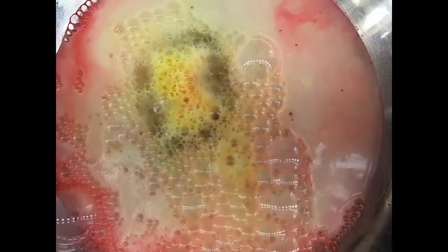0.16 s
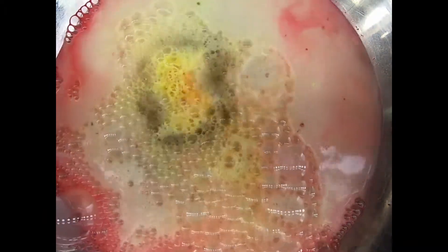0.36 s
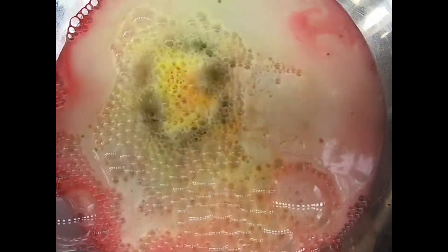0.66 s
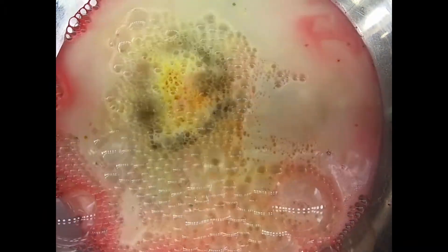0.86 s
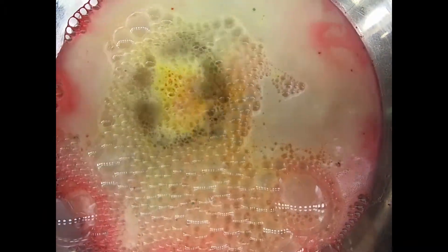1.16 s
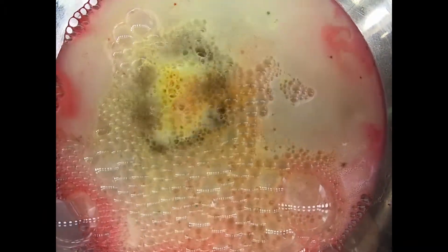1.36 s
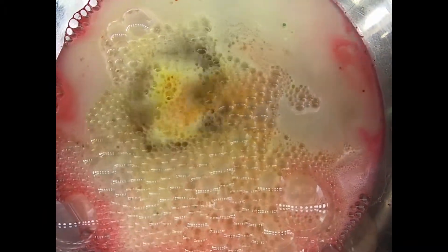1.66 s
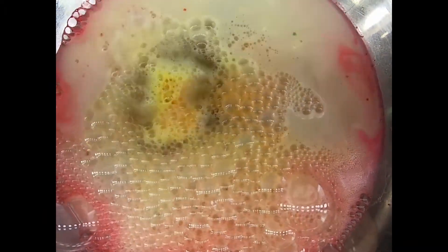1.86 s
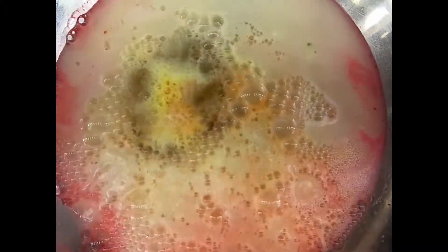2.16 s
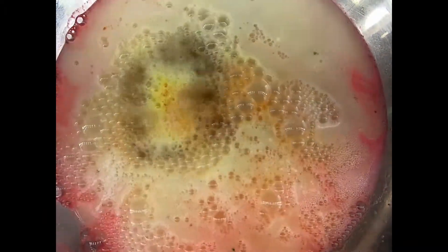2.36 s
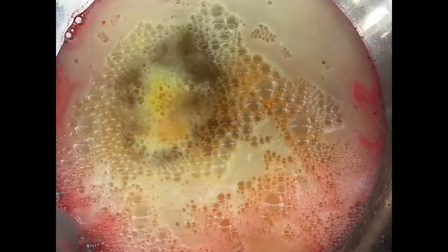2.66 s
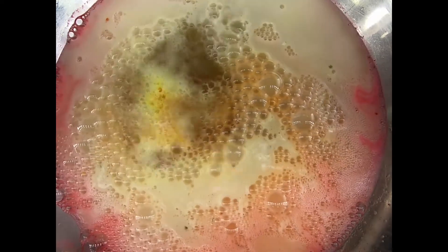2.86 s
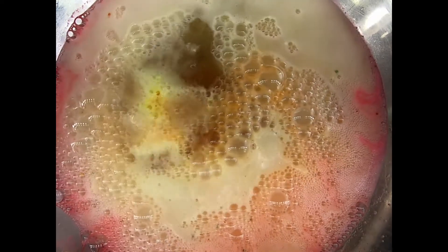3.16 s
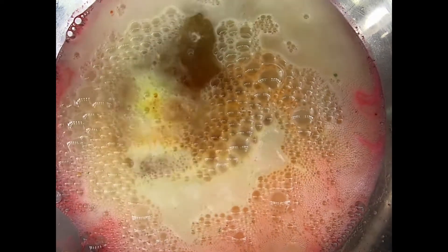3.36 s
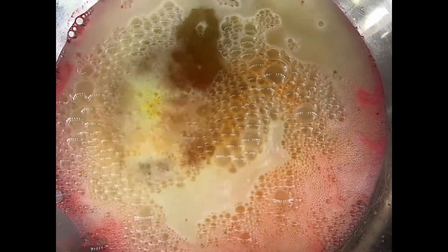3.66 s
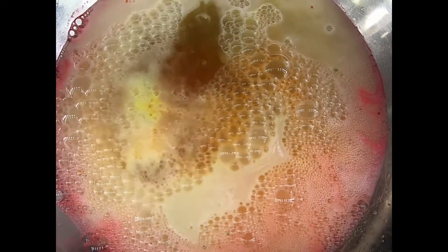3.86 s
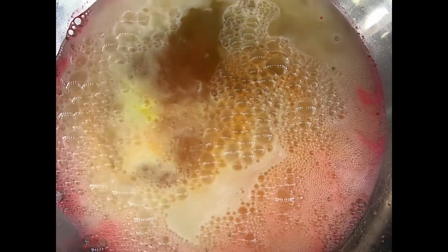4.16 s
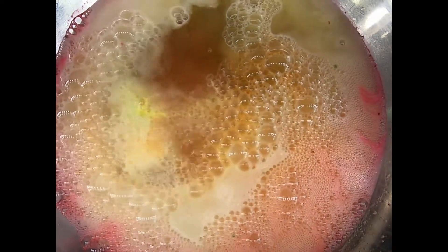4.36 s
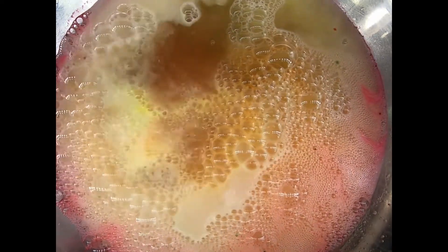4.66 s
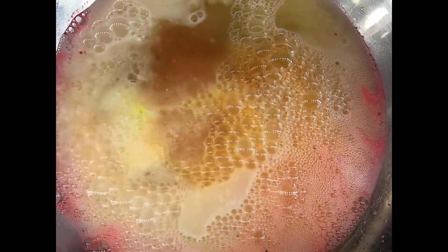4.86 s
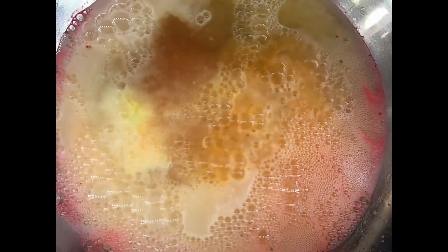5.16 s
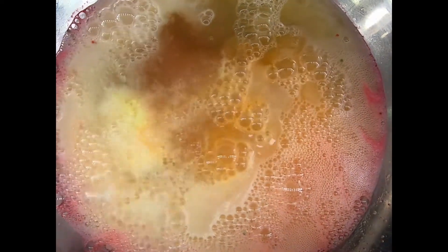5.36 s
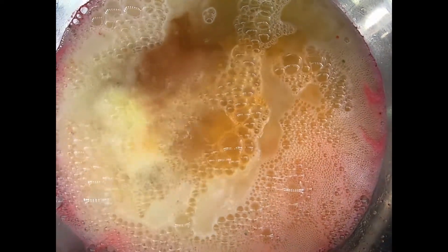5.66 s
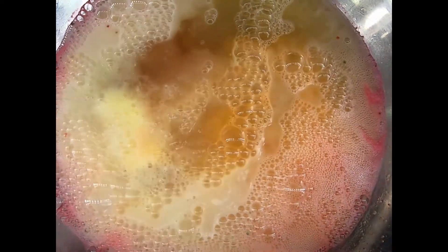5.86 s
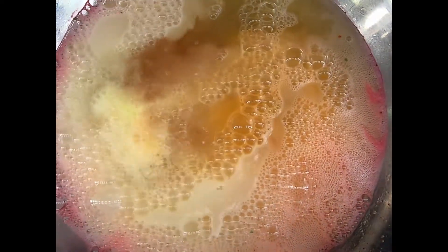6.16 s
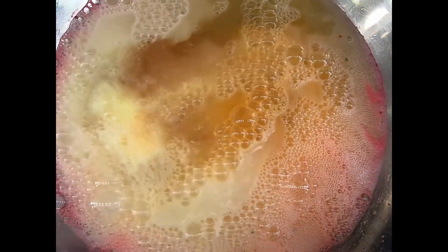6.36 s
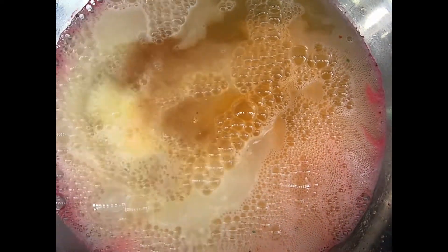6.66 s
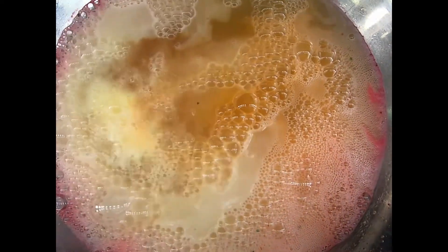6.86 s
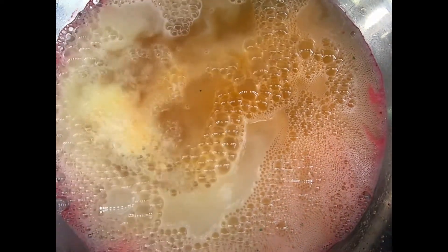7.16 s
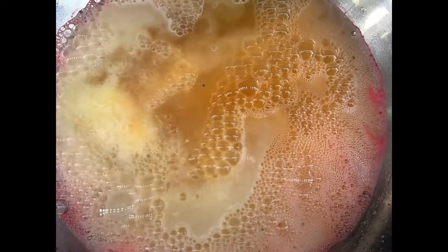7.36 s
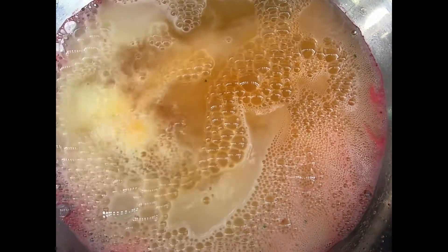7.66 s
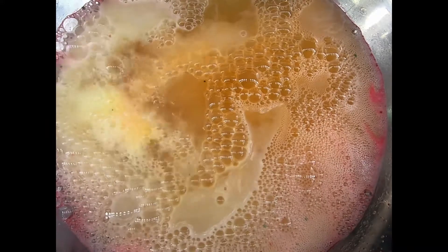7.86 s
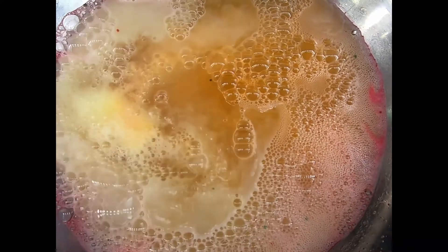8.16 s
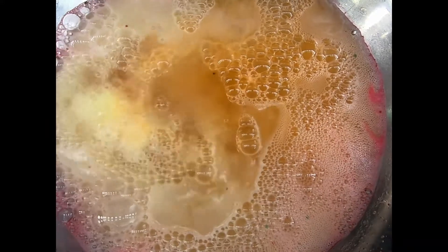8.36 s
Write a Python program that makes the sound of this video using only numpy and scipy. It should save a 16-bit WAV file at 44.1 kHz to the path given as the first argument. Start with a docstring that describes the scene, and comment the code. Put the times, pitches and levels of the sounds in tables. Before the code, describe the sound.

Dense, fine fizzing from a dissolving bath bomb, a few bubble pops and tiny chirps, and a quiet engine-like rumble pulsing in the second half.

```python
"""Indoors, over a bowl of water: a bath bomb fizzes, and it calms down as the ball sinks.
The fizz is thousands of tiny rings mixed with noise: fine foam hiss, coarser bubbles, spray and gurgling pockets.
Larger pops and a few singing small bubbles are decaying, gliding sines, the pops with a puff of noise.
Behind them are a room murmur of shaped noise, a faint unsteady hum, and a low drone, perhaps an
engine outside: a tone with overtones that swells in as a string of throbs, over a looser rumble."""
import sys
import numpy as np
from scipy import signal
from scipy.fft import rfft, irfft, next_fast_len
from scipy.io import wavfile
from scipy.ndimage import uniform_filter1d, map_coordinates

SR = 44100
rng = np.random.default_rng(int(sys.argv[2]) if len(sys.argv) > 2 else 0)


def dump_mix(stems):
    """Bounce the given channels to the path in sys.argv[1] as a 16-bit WAV at rate SR."""
    frames = np.atleast_2d(stems).T  # one column per channel
    limited = np.clip(frames, -1, 1)  # hard clip at full scale
    pcm = np.round(limited * 32767).astype(np.int16)
    wavfile.write(sys.argv[1], SR, pcm)


N = 375732

# All spectra below give relative density; the sound they colour is then set to its own level.

# Low room murmur: (time [s], level [dB])
LOW_MURMUR_LEVEL = [(0.0, -67), (1.3, -65.5), (2.0, -68), (2.63, -66.5), (3.5, -66), (4.08, -61.5),
                    (4.7, -65), (5.43, -60), (5.95, -63.5), (6.3, -59), (6.85, -60), (7.1, -61.5),
                    (7.6, -59), (7.8, -62), (8.1, -60.5), (8.52, -59)]
# Colour of the low murmur, with the room's resonances: (frequency [Hz], density [dB])
LOW_MURMUR_SPECTRUM = [(60, -40), (120, -18), (137, -6.5), (150, -4.5), (167, -8), (182, 0.5), (198, -3),
                       (210, 2), (221, -5.5), (233, -0.5), (244, -10.5), (262, -9), (280, -16), (295, -12),
                       (310, -14), (335, -27), (400, -60), (450, -100)]
# Mid room murmur: (time [s], level [dB], depth of its quiet pockets [dB])
MID_MURMUR = [(0, -72, 8), (.1, -80, 24), (.3, -78, 26), (.45, -74, 22), (.9, -77, 22), (1.0, -78, 18),
              (1.32, -78, 26), (1.44, -76, 26), (1.95, -77, 30), (2.15, -73.5, 24), (2.7, -73.5, 28),
              (3.3, -72.5, 24), (4.08, -71.5, 6), (4.5, -74, 14), (4.9, -71.5, 10), (5.43, -72, 6),
              (6.5, -71.5, 9), (8.52, -69.5, 4)]
# Colour of the mid murmur: (frequency [Hz], density [dB])
MID_MURMUR_SPECTRUM = [(230, -64), (290, -3), (350, -6), (420, -6), (480, -7), (530, -4.5), (600, -4),
                       (700, -40), (800, -90)]
# Quiet gap wandering through the mid murmur, then closing: (time [s], centre [Hz], half width [Hz])
MURMUR_GAP = [(0, 450, 10), (.1, 480, 64), (.17, 500, 35), (.28, 465, 95), (.4, 407, 55), (.6, 430, 67),
              (.9, 440, 50), (.99, 490, 15), (1.1, 430, 55), (1.25, 382, 55), (1.33, 420, 100),
              (1.42, 450, 5), (1.58, 418, 10), (1.65, 440, 50), (1.75, 370, 27), (1.85, 450, 5),
              (1.96, 450, 70), (2.08, 453, 35), (2.15, 450, 1)]
# Colour of the deep, slightly unsteady floor under the murmur: (frequency [Hz], density [dB])
DEEP_SPECTRUM = [(15, -13), (40, -1), (75, -6), (100, -8), (130, -27), (300, -90)]
# Faint hum: (time [s], level [dB])
HUM_LEVEL = [(0, -66.5), (.3, -72.5), (1.25, -61.5), (1.6, -70), (2.3, -79.5), (4, -71.5), (5.5, -72),
             (6.2, -77)]
# Throbs of the drone: (time of crest [s], level at crest [dB], length [s])
DRONE_THROBS = [(4.05, -62, .1), (4.17, -54, 0.051), (4.3, -61, .12), (4.41, -61, 0.09), (4.55, -56, 0.097),
                (4.67, -61, .18), (4.9, -55.5, .13), (5.02, -54, .14), (5.19, -55.5, 0.28),
                (5.33, -52.5, 0.21), (5.455, -44.5, 0.14), (5.565, -46, 0.19), (5.695, -46.5, 0.1),
                (5.76, -47, 0.074), (5.82, -54, 0.076), (5.885, -45.5, 0.15), (5.985, -42.5, .18),
                (6.05, -57, 0.091), (6.125, -46.5, 0.21), (6.3, -49, 0.17), (6.435, -45.5, 0.21),
                (6.53, -55, 0.12), (6.625, -52, 0.12), (6.88, -47.5, 0.54), (7.19, -47.5, 0.23),
                (7.3, -44, 0.2), (7.35, -55, 0.089), (7.53, -58, .12), (7.59, -40.5, 0.11),
                (7.67, -43, 0.14), (7.83, -56, 0.065), (7.89, -55, 0.091), (7.955, -41, 0.15),
                (8.03, -40.5, 0.094), (8.095, -52, 0.062), (8.19, -58, 0.088), (8.26, -50, 0.17),
                (8.36, -44, 0.15), (8.43, -50, 0.067)]
# Overtones of the drone: (multiple of its pitch [ratio], level against the fundamental [dB])
DRONE_OVERTONES = [(1.56, -22), (2.05, -23), (3, -25)]
# Colour of the rumble around the drone: (frequency [Hz], density [dB])
RUMBLE_SPECTRUM = [(12, -30), (24, -21), (46, 7), (60, 3), (85, -5), (106, -4), (120, -7), (140, -48),
                   (300, -90)]
# The rumble's own swells: (time of crest [s], level at crest [dB], length [s])
RUMBLE_SWELLS = [(5.7, -65, .2), (8.25, -61, 0.99)]
# Larger bubbles bursting: (time [s], level [dB], starting pitch [Hz],
# brightness of the snap before a shared boost [dB], ring time to fall 60 dB [s])
LARGE_POPS = [(2.169, -53, 950, 11, 0.028), (3.744, -52, 595, 1, 0.037), (3.9, -49.5, 705, -5, .04),
              (3.926, -50, 700, -8, .03), (4.0, -46.5, 725, 3, 0.024), (4.076, -50, 820, -4, .03),
              (4.156, -39.5, 790, -2, 0.016), (4.174, -49, 790, -10, .03), (4.214, -50, 667, -8, .045),
              (4.255, -55, 840, -10, .03), (4.271, -52, 630, -12, 0.049), (4.306, -48, 650, -10, .03),
              (4.318, -50, 633, -12, 0.057), (5.226, -50, 750, -6, .04), (5.371, -53, 756, -4, .04),
              (5.563, -51, 766, -6, 0.042), (5.76, -53, 698, -4, 0.037), (6.469, -51, 660, 0, 0.045),
              (7.819, -50, 674, -7, 0.046)]
# Small bubbles that sing briefly: (time [s], level [dB], starting pitch [Hz])
SINGING_BUBBLES = [(7.174, -39.5, 2960), (7.445, -43, 3200), (8.034, -46, 2300), (8.068, -43, 2500),
                   (8.208, -43, 3100)]
# The fizz as the ball sinks: (time [s], fine foam [dB], coarse bubbles [dB], finest spray [dB])
FIZZ_LEVELS = [(0.0, -38.5, -42, -58.5), (1.0, -39, -43.5, -58.5), (2.06, -39, -45.5, -58),
               (3.08, -39.5, -49, -59.5), (3.4, -40, -51.5, -60), (3.8, -41, -52.5, -60),
               (4.41, -40.5, -55, -60.5), (5.0, -41, -55, -62), (5.6, -41.5, -55.5, -61.5),
               (6.5, -41.5, -56, -62), (7.4, -42, -56.5, -62), (8.0, -42.5, -54, -62.5),
               (8.52, -42.5, -54.5, -63)]
# One brief dip in foam, bubbles and spray: (time [s], half width [s], level change [dB])
FIZZ_DIP = (4.527, .009, -5)
# Larger gas pockets gurgling under the foam: (time [s], level [dB])
GURGLE_LEVEL = [(0.0, -64), (1.4, -66.5), (2.8, -67), (3.5, -66), (4.25, -65), (5.0, -64), (5.9, -64),
                (6.7, -67.5), (7.8, -64.5), (8.52, -66)]
# Colour of the fine foam: (frequency [Hz], density [dB])
FOAM_SPECTRUM = [(500, -110), (710, -51), (1200, -22.5), (1490, -20.5), (1780, -16), (1980, -13),
                 (2140, -10), (2260, -13.5), (2570, -12.5), (2820, -12.5), (2990, -4.5), (3400, -4.5),
                 (3480, -2), (3560, -5), (3770, -3.5), (4120, -4.5), (4820, -2.5), (7400, -2.5),
                 (9260, -4.5), (10300, -13.5), (11200, -46), (12000, -90)]
# Colour of the coarse bubbles: (frequency [Hz], density [dB])
BUBBLE_SPECTRUM = [(450, -110), (560, -60), (800, -27), (1100, -13), (1600, -7.5), (2500, -1.5),
                   (3600, -1.5), (5000, -12.5), (8000, -11), (10000, -58)]
# Colour of the finest spray: (frequency [Hz], density [dB])
SPRAY_SPECTRUM = [(8500, -80), (9800, -18), (10600, 0.5), (12500, 0), (14500, -5), (15500, -12)]
# Colour of the gas pockets: (frequency [Hz], density [dB])
POCKET_SPECTRUM = [(430, -100), (520, -45), (570, -15), (600, -3), (680, 2.5), (850, 1.5), (1100, -4),
                   (1500, -25), (2000, -46)]
# Stereo width: (frequency [Hz], left-right likeness [correlation])
STEREO_LIKENESS = [(60, 1), (99, -0.14), (160, 0.96), (270, 0.26), (450, 0.44), (740, 0.33),
                   (1100, -0.0052), (1500, 0.39), (2100, 0.64), (2800, 0.56), (3800, 0.89), (5200, 0.58),
                   (7000, 0.75), (9000, 0.14), (11000, 0.12), (15000, -0.026)]
# Stereo balance: (frequency [Hz], left over right [dB])
STEREO_LEAN = [(60, -1), (130, -2.5), (290, -1), (640, 2.2), (1100, 1.4), (1500, 2), (2100, 2), (2900, 0.3),
               (3900, 1.6), (6820, -1), (11500, -0.1), (13500, 2)]
# Stereo phase: (frequency [Hz], lead of the left [radians])
STEREO_LEAD = [(500, 0.22), (900, 0.5), (1500, -0.5), (2100, -0.26), (2900, -0.1), (3900, 0.02),
               (5200, 0.72), (7000, 1.23), (9000, 2.5), (11000, 2.5)]

HUM_HZ = 148.3
THROB_FOLLOW = 0.2  # how far the low murmur throbs with the drone: power of the drone's relative level
POCKET_OPEN = -0.35  # pockets open where a random field of rms 1 falls under this
GAP_DB = -30
DRONE_HZ, DRONE_RISE_HZ_PER_S = 64, 0.5  # pitch at time zero, and how it climbs
DRONE_WANDER_HZ, DRONE_FLUTTER_DB = 0.8, 0.6  # scale of the slower pitch and quicker level unrest
LINGER_DB, LINGER_S = -16, 0.35  # tone between throbs: under their running level; averaging time
RUMBLE_DB, RUMBLE_AVERAGE_S, RUMBLE_LUMPS_DB = -14, 0.18, 3  # under running level; averaging; unrest
POP_ATTACK_S = 0.0005
TOP_HZ = 15600


def amp(db):
    """Decibels to gain."""
    return 10 ** (np.asarray(db) / 20)


def unit(x):
    """Scaled to rms 1."""
    return x / np.sqrt(np.mean(x ** 2) + 1e-20)


def along(points, hz):
    """Read (frequency, value) points on a log frequency axis."""
    f, v = np.transpose(points)
    return np.interp(np.log(hz + 1), np.log(f + 1), v)


def curves(rows):
    """One value per sample for each column after the time."""
    s, *cols = np.transpose(rows)
    return [np.interp(np.arange(N) / SR, s, c, left=c[0]) for c in cols]


def wobble(rate):
    """A smooth random curve with rate knots a second, 100 at most."""
    knots = rng.standard_normal(200 + N // 400)
    return map_coordinates(knots, [np.arange(N) * min(rate, 100) / SR])


def humps(rows):
    """A level built of smooth humps, each a squared half wave, added where they overlap."""
    t = np.arange(N) / SR
    return sum(amp(db) * np.cos(np.pi * np.clip((t - s) / length, -.5, .5)) ** 2
               for s, db, length in rows)


def filtered(x, response):
    """Shape x with a response of frequency."""
    m = next_fast_len(N + 8192)
    return irfft(rfft(x, m) * response(np.fft.rfftfreq(m, 1 / SR)), m)[..., :N]


def spread(pair, spectrum):
    """Two unrelated flat sounds, coloured and mixed into stereo of rms 1."""
    def mid_side_response(hz):
        # this angle between mid and side gives the wanted left-right likeness
        angle = np.arccos(np.clip(along(STEREO_LIKENESS, hz), -1, 1)) / 2
        return amp(along(spectrum, hz)) * [np.cos(angle), np.sin(angle)]

    mid, side = filtered(pair, mid_side_response)
    return unit(np.array([mid + side, mid - side]))


def random_field(shape, bins, frames):
    """A random pattern of rms 1 over pitch and time, smoothed along both."""
    field = uniform_filter1d(rng.standard_normal(shape), size=bins, axis=0)
    return unit(uniform_filter1d(field, size=frames, axis=1))


def pocketed():
    """Two flat noises that drop away in narrow pockets of time and pitch, and along the wandering gap."""
    hz, t, z = signal.stft(rng.standard_normal((2, N)), SR, nperseg=2048)
    field = random_field(z.shape[1:], bins=3, frames=3)
    when, centre_hz, half_hz = np.transpose(MURMUR_GAP)
    centre = np.interp(t, when, centre_hz)
    half_width = np.interp(t, when, np.maximum(half_hz, 1))
    gap_db = GAP_DB * np.exp(-((hz[:, None] - centre) / half_width) ** 4)
    s, _, depth_db = np.transpose(MID_MURMUR)
    pocket_db = np.interp(t, s, depth_db) * np.clip(2 * (field - POCKET_OPEN), -1, 0)
    return signal.istft(z * amp(pocket_db + gap_db), SR, nperseg=2048)[1][:, :N]


def murmur():
    """Room murmur: noise in two bands over a deep floor, the low one throbbing a little with the drone."""
    low_noise, deep_noise = rng.standard_normal((2, 2, N))
    throb = humps(DRONE_THROBS)
    quick = uniform_filter1d(throb, int(0.08 * SR)) + amp(-56)
    slow = uniform_filter1d(throb, int(0.8 * SR)) + amp(-56)
    unrest_db = 1.4 * wobble(5)  # shared by both bands
    low_db = curves(LOW_MURMUR_LEVEL)[0] + unrest_db + 1.16 * wobble(9)
    low = amp(low_db) * (quick / slow) ** THROB_FOLLOW * spread(low_noise, LOW_MURMUR_SPECTRUM)
    mid_db = curves(MID_MURMUR)[0] + unrest_db + 1.1 * wobble(15)
    mid = amp(mid_db) * spread(pocketed(), MID_MURMUR_SPECTRUM)
    floor = deep_noise[0] + 0.49 * deep_noise[1] * [[1], [-1]]
    floor = unit(filtered(floor, lambda hz: amp(along(DEEP_SPECTRUM, hz))))
    return low + mid + amp(-76.5 + 2.2 * wobble(5.5)) * floor


def hum():
    """A faint sine of slightly unsteady pitch, its phase set apart left and right."""
    phase = 2 * np.pi * np.cumsum(HUM_HZ + 1.66 * wobble(6)) / SR
    tone = np.sqrt(2) * np.sin(phase + np.array([[.3], [-.3]]))  # rms 1
    return amp(curves(HUM_LEVEL)[0]) * tone


def drone():
    """A throbbing, slowly climbing low tone, with a rumble of noise that follows its smoothed level."""
    t = np.arange(N) / SR
    throb = humps(DRONE_THROBS)
    linger = amp(LINGER_DB) * uniform_filter1d(throb, int(LINGER_S * SR))
    level = np.hypot(throb, linger) * amp(DRONE_FLUTTER_DB * wobble(22))
    pitch_hz = DRONE_HZ + DRONE_RISE_HZ_PER_S * t + DRONE_WANDER_HZ * wobble(8)
    phase = 2 * np.pi * np.cumsum(pitch_hz) / SR
    tone = np.sin(phase) + sum(amp(db) * np.sin(k * phase) for k, db in DRONE_OVERTONES)
    a, b = filtered(rng.standard_normal((2, N)), lambda hz: amp(along(RUMBLE_SPECTRUM, hz)))
    rumble = unit(np.array([a + 0.71 * b, a - 0.34 * b]))
    running = uniform_filter1d(throb, int(RUMBLE_AVERAGE_S * SR))
    follows = running * amp(RUMBLE_DB + RUMBLE_LUMPS_DB * wobble(9.4))
    return level * tone * amp([[-.3], [.3]]) + (follows + humps(RUMBLE_SWELLS)) * rumble


def chirps():
    """A lone small bubble rings briefly as a decaying sine, rising a little in pitch."""
    out, t = np.zeros(N + SR), np.arange(SR // 20) / SR
    envelope = amp(-60 * t / 0.06) * (1 - np.exp(-t / 0.003))
    for s, db, hz in SINGING_BUBBLES:
        ring = np.sin(2 * np.pi * hz * t * (1 + 2.5 * t)) * envelope
        out[round(s * SR):][:len(t)] += amp(db) * ring
    return out[:N]


def pops():
    """A large bubble opens with a short blip of falling pitch, a brighter snap and a puff of noise."""
    out, t = np.zeros(N + SR), np.arange(SR // 20) / SR
    attack = 1 - np.exp(-t / POP_ATTACK_S)
    for s, db, hz, snap_db, t60 in LARGE_POPS:
        blip = np.sin(2 * np.pi * hz * t * (1 - 2.0 * t)) * amp(-60 * t / t60)
        snap = amp(snap_db + 6.5) * np.sin(2 * np.pi * 1950 * t) * amp(-60 * t / 0.0095)
        puff = 1.15 * uniform_filter1d(rng.standard_normal(len(t)), size=12) * amp(-60 * t / 0.015)
        out[round(s * SR):][:len(t)] += amp(db) * (blip + snap + puff) * attack
    return out[:N] * amp([[1.5], [-1.5]])  # louder on the left


def patchy(depth_db):
    """Two flat noises whose level varies at random in small patches of time and pitch."""
    z = signal.stft(rng.standard_normal((2, N)), nperseg=512)[2]
    field = random_field(z.shape[1:], bins=2, frames=8)
    return unit(signal.istft(z * amp(depth_db * field), nperseg=512)[1][:, :N])


def bursts(count, low_hz, high_hz, cycles, scatter_db):
    """Two streams of bursting bubbles, each a short rising ring that decays 60 dB in so many cycles."""
    when, size, loud, side = rng.random((count, 4)).T
    hz = (low_hz * (high_hz / low_hz) ** size)[:, None]
    k = np.arange(128)
    turns = hz * k / SR
    # small bubbles ring high and short; strength grows with pitch to keep the spectrum level
    strength = hz * amp(scatter_db * loud)[:, None]
    decay = np.exp(-np.log(1000) * turns / cycles)
    shape = turns * decay * np.cos(np.pi * k / 256)  # the cosine fades out the tail
    ring = strength * shape * np.sin(2 * np.pi * turns * (1 + 0.013 * turns))
    # both streams lie end to end in one line, then are split
    place = (when * N).astype(int)[:, None] + k + (side > .5)[:, None] * (N + 128)
    line = np.bincount(place.ravel(), ring.ravel(), 2 * N + 256)
    return unit(line.reshape(2, -1)[:, :N])


def fizz():
    """Fine foam crackles as near-even hiss with spray above; coarse bubbles and gas pockets lie below."""
    foam_db, coarse_db, spray_db = curves(FIZZ_LEVELS)
    s, width, dip_db = FIZZ_DIP
    dip = dip_db * np.exp(-((np.arange(N) / SR - s) / width) ** 2)
    shared_db = 0.15 * wobble(6.3) + dip
    fine = bursts(count=24000, low_hz=2400, high_hz=13170, cycles=21, scatter_db=10.0)
    fine = 0.26 * fine + patchy(1.1)
    coarse = bursts(count=16000, low_hz=1500, high_hz=6800, cycles=46, scatter_db=1)
    coarse = 0.28 * coarse + patchy(1.0)
    pockets = bursts(count=1500, low_hz=540, high_hz=1220, cycles=4.1, scatter_db=-4.5)
    pockets = 0.17 * pockets + rng.standard_normal((2, N))
    foam = amp(foam_db + shared_db + 0.17 * wobble(25)) * spread(fine, FOAM_SPECTRUM)
    froth = amp(coarse_db + shared_db + 0.097 * wobble(8.6)) * spread(coarse, BUBBLE_SPECTRUM)
    spray = amp(spray_db + shared_db + 0.28 * wobble(7.3)) * spread(patchy(1.8), SPRAY_SPECTRUM)
    gurgle = amp(curves(GURGLE_LEVEL)[0]) * spread(pockets, POCKET_SPECTRUM)
    return foam + froth + spray + gurgle


def scene():
    """All sources; fizz, murmur and hum reach left and right at unlike levels and phases."""
    half = np.array([[.5], [-.5]])

    def left_right(hz):
        return amp(along(STEREO_LEAN, hz) * half) * np.exp(1j * along(STEREO_LEAD, hz) * half)

    return filtered(murmur() + hum() + fizz(), left_right) + drone() + chirps() + pops()


def record(dry):
    """Cut everything above the band limit."""
    return filtered(dry, lambda hz: hz < TOP_HZ)


dry = scene()
out = record(dry)
dump_mix(out)
```